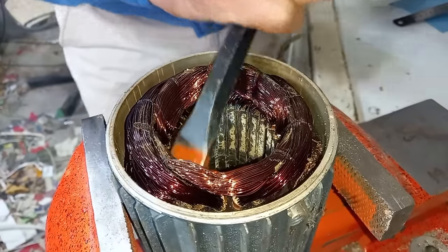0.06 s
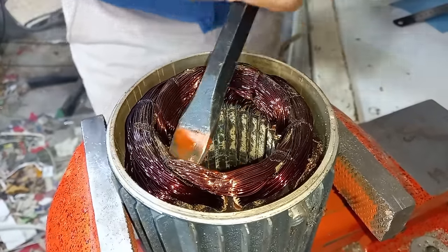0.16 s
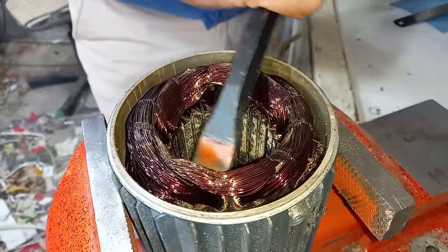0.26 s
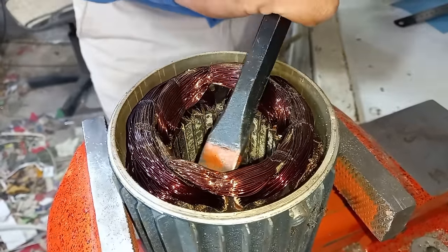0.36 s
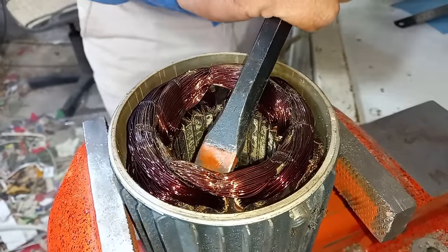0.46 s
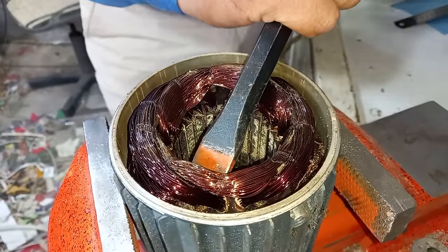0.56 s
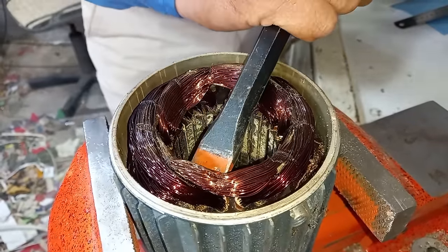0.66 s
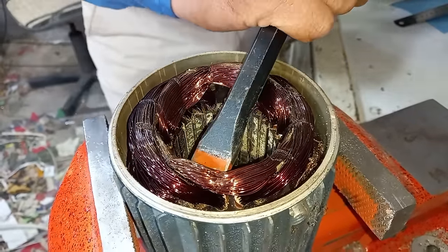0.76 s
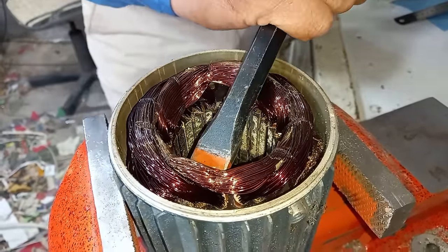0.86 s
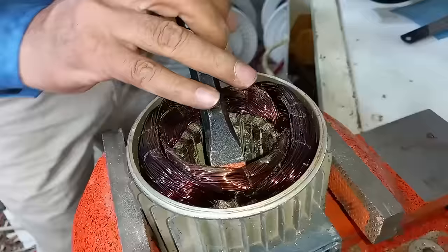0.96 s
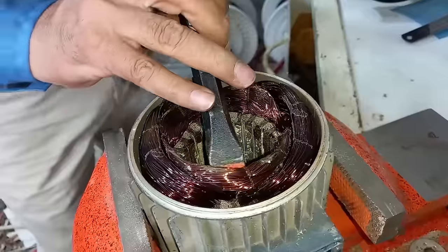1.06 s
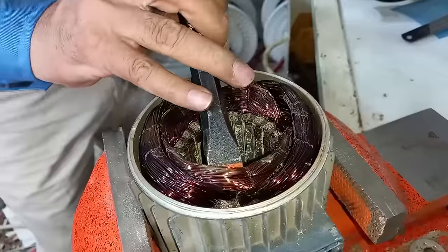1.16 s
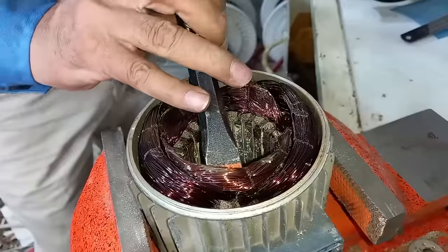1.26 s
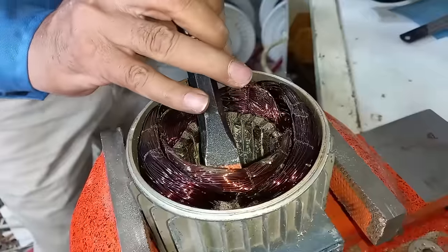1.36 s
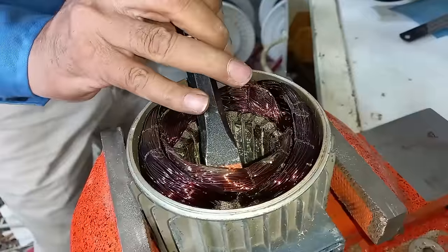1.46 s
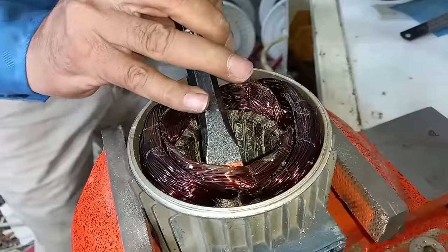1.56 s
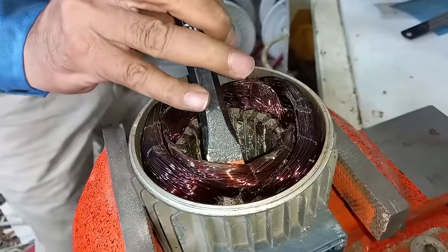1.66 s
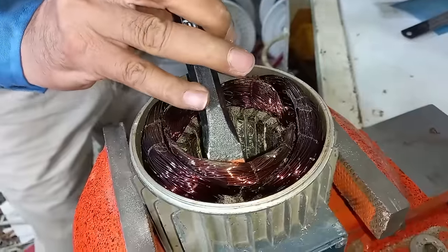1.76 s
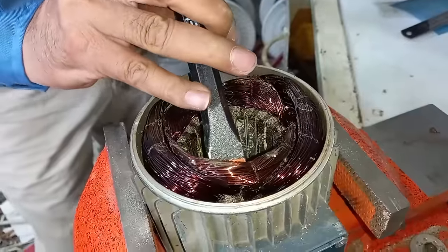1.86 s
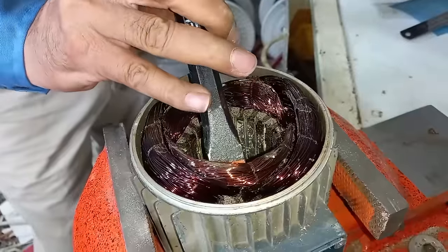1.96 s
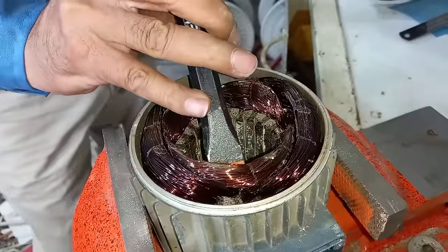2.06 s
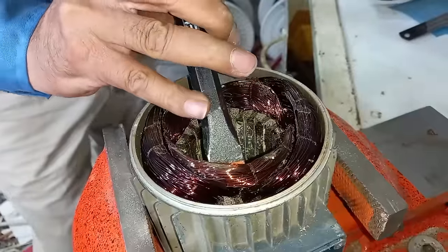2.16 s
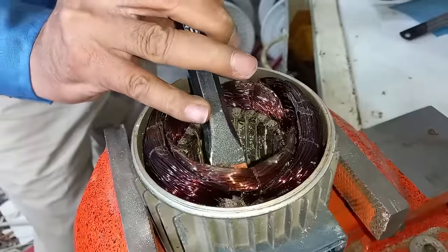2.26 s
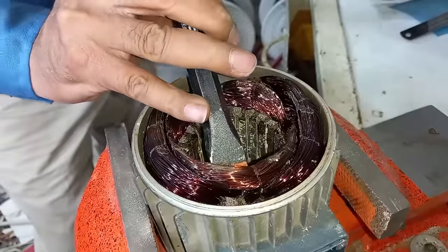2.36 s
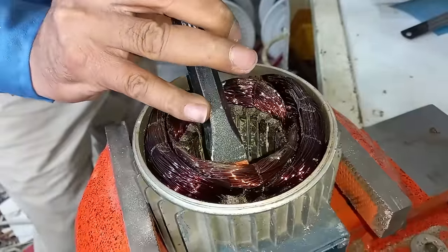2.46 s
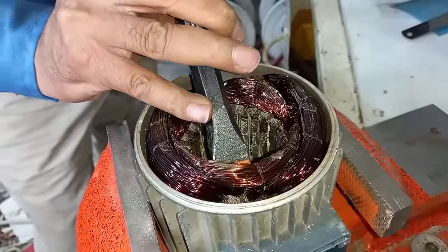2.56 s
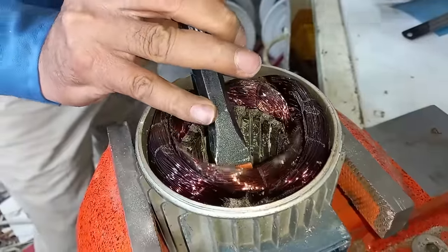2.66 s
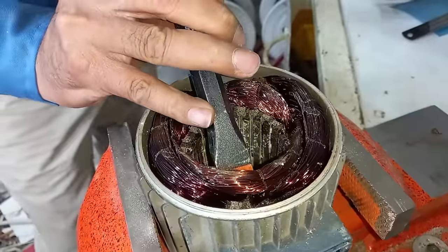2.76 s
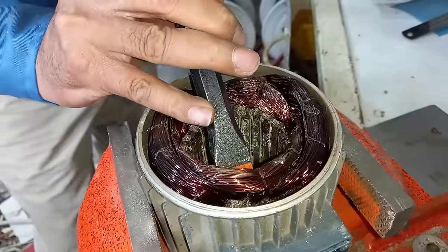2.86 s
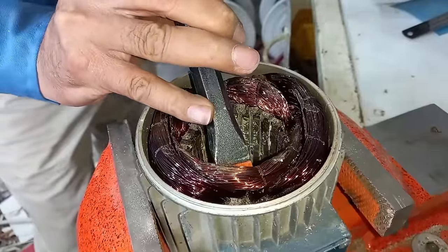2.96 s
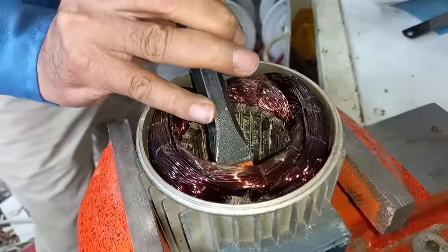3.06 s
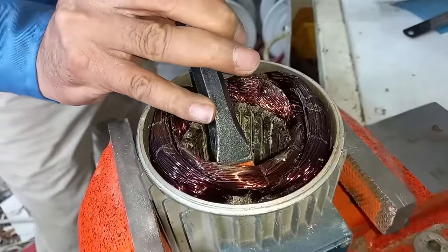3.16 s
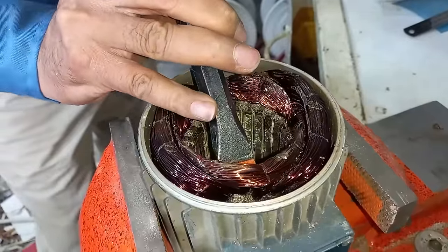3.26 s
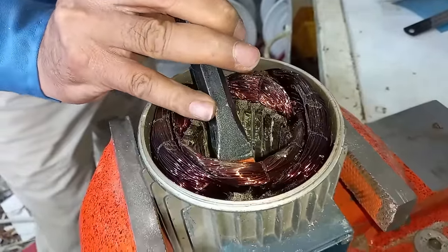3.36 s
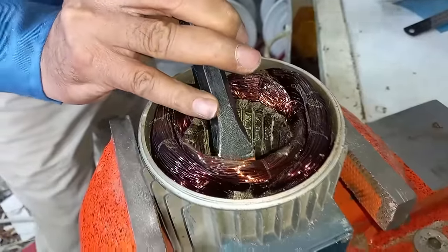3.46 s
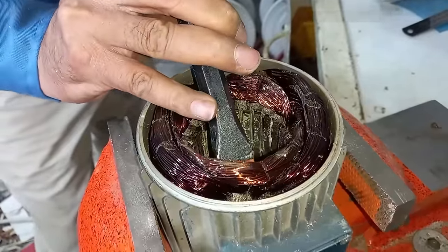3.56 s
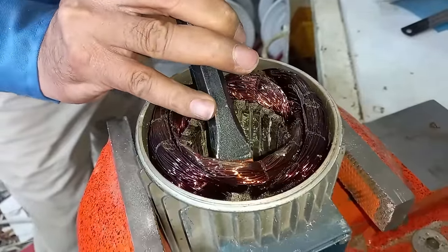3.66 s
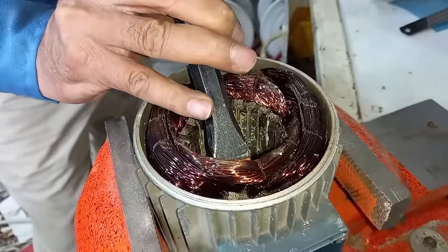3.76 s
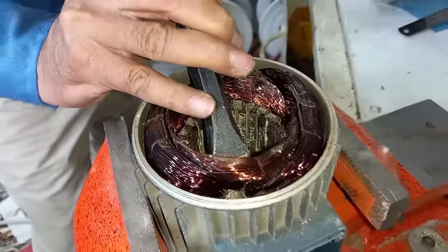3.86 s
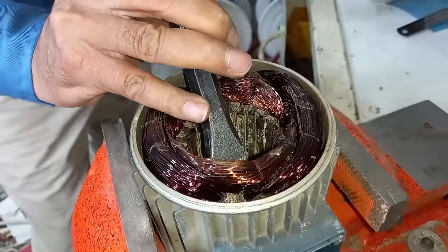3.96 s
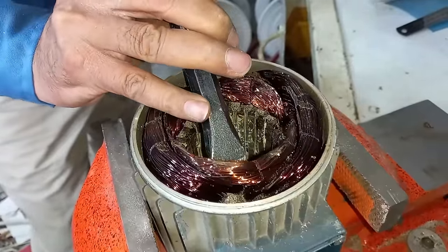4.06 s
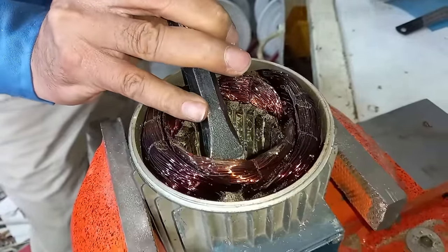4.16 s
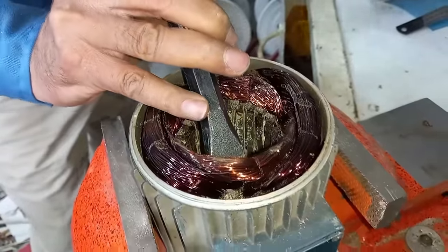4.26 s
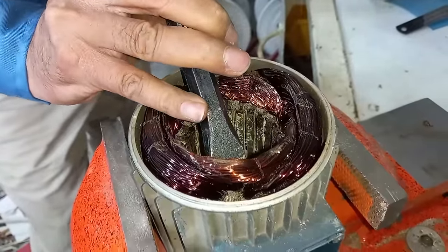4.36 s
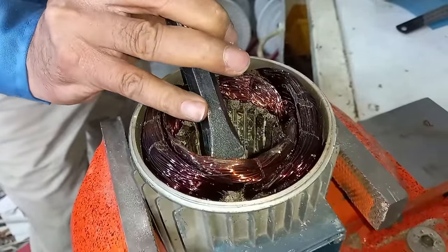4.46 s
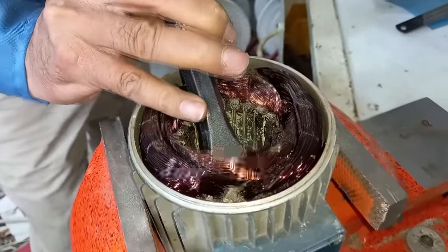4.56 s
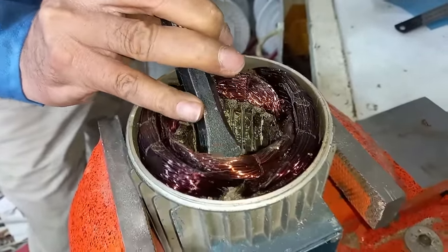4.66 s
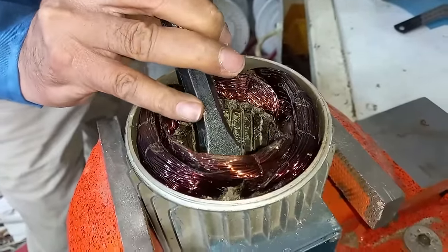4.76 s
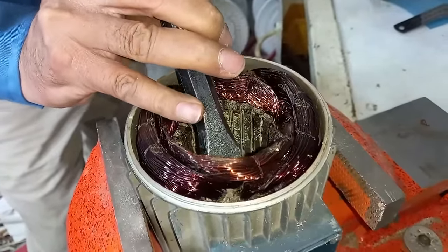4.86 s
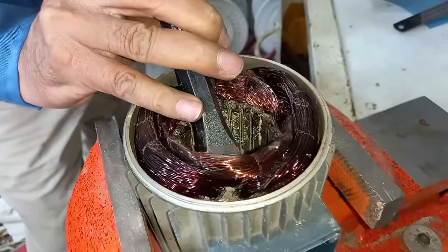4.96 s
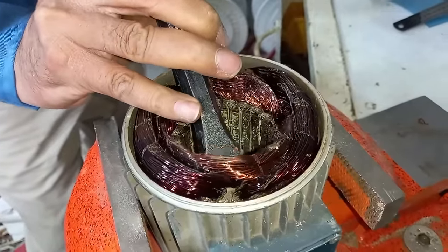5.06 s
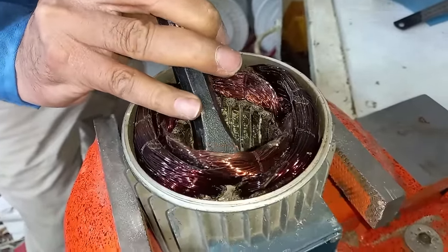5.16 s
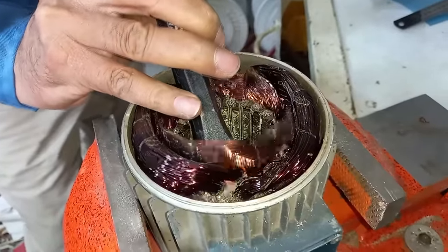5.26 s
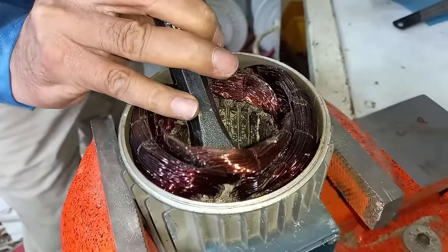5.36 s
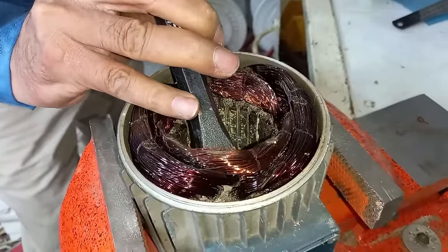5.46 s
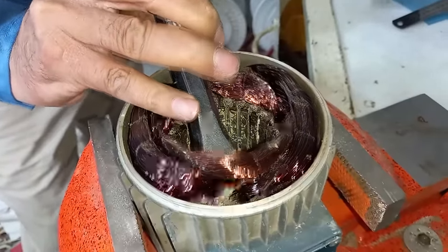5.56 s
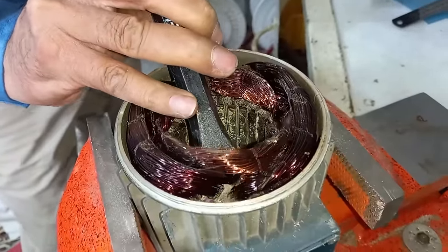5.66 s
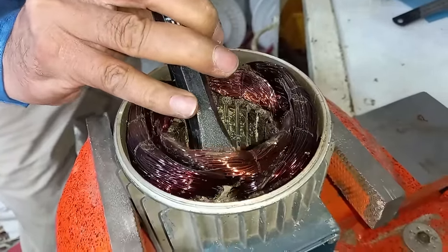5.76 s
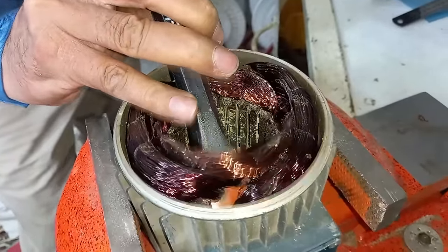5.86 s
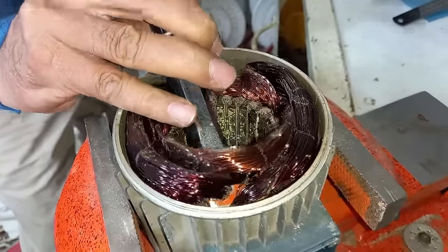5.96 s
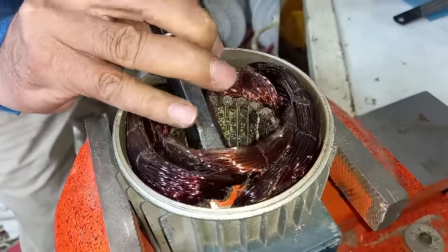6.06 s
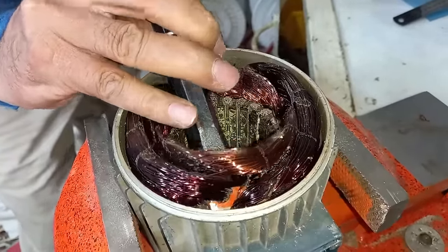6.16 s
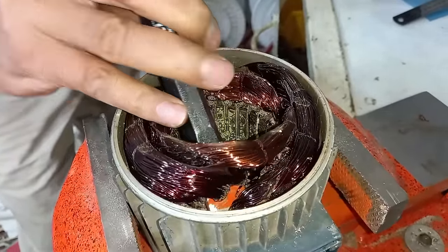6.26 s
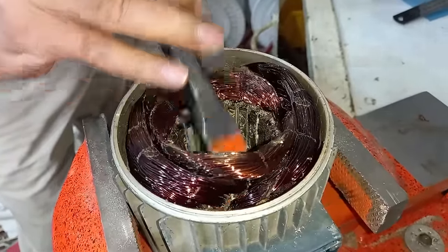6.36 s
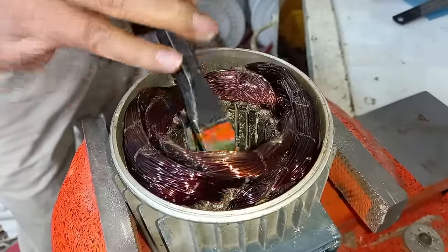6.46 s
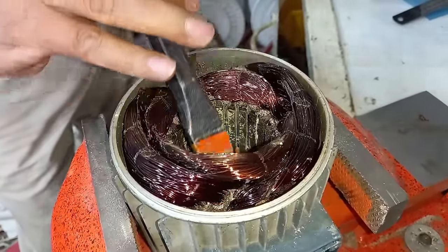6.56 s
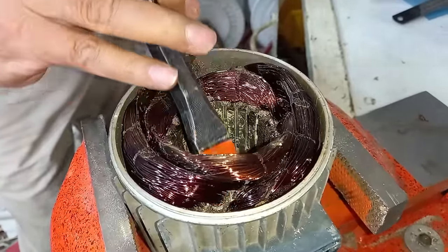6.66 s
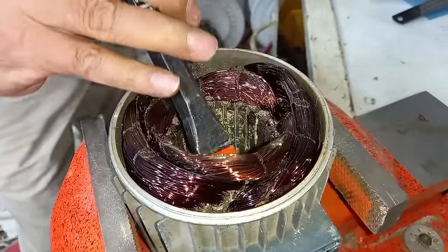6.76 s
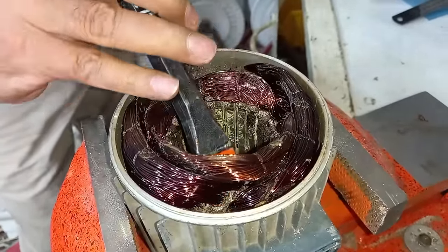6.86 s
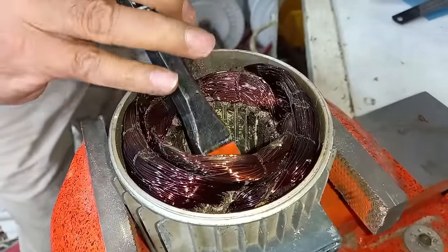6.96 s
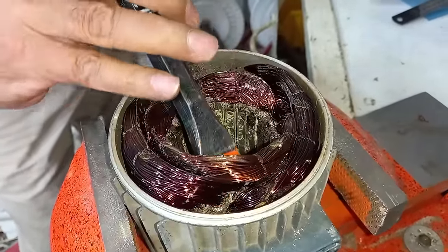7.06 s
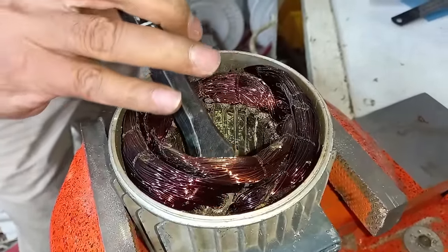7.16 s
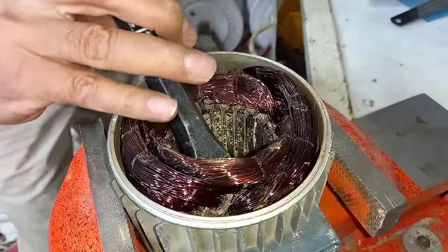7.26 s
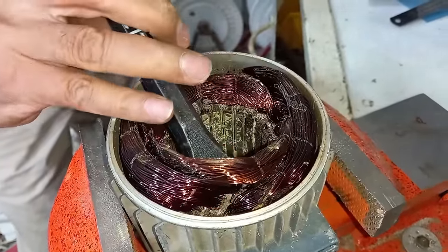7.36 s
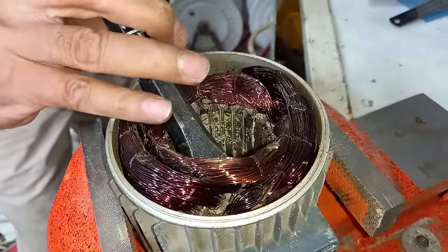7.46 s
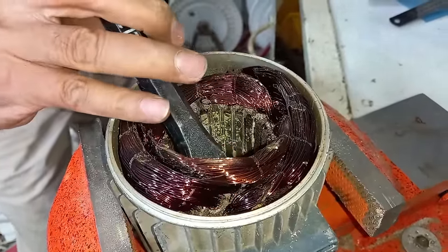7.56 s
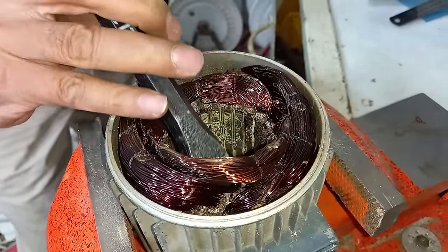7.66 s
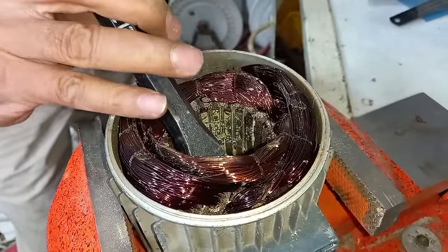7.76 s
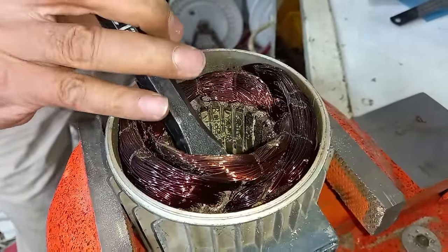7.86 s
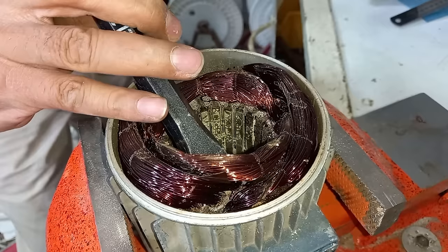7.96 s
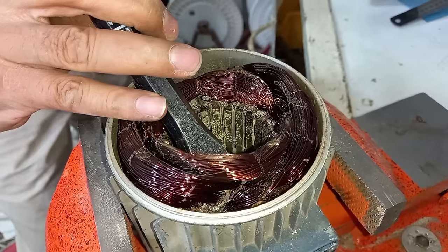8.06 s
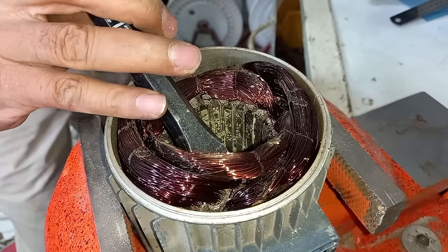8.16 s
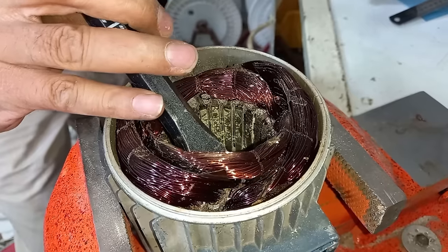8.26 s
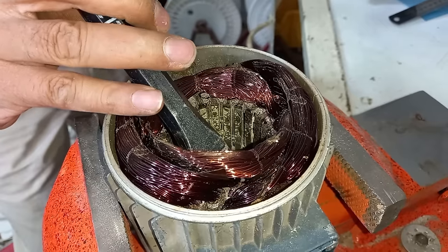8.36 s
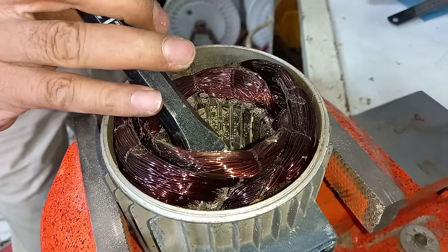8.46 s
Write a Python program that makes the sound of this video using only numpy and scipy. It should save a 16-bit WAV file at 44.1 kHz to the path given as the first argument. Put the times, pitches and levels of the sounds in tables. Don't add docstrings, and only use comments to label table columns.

```python
import sys
import numpy as np
from scipy import signal
from scipy.io import wavfile

SR = 44100
rng = np.random.default_rng(int(sys.argv[2]) if len(sys.argv) > 2 else 0)


def unload_audio(sound):
    columns = np.transpose(np.atleast_2d(sound))
    steps = np.round(np.clip(columns, -1, 1) * 32767)
    wavfile.write(sys.argv[1], SR, steps.astype(np.int16))


def boost_factor(decibels):
    exponent = np.asarray(decibels, float) / 20
    return 10 ** exponent


N = 375732

# time in seconds, gain in dB.
BACKGROUND_GATE = [
    [(0.0, -29), (0.3, -32), (0.51, -18.5), (0.975, -19)],
    [(1.03, -0.7), (1.3, -3.5), (1.9, -0.7), (4.2, 5), (6.1, -6.5), (6.35, -2.5), (6.6, -8.5), (7.1, -9.5),
     (7.37, -2), (8.04, -2.3), (8.52, 1)],
]
# frequency in Hz, level in dB per Hz.
RUMBLE_SPECTRUM = [(15, -53), (25, -21.5), (46, -13.5), (97, 4), (133, -15.5), (162, -6.5), (194, -17.5),
                   (334, -11.5), (700, -24.5), (910, -61.5), (1540, -120)]
# centre in Hz, width in Hz, level in dB.
RUMBLE_PEAKS = [(59.5, 8, -1.5), (97, 6.8, 1), (161, 10, -12), (334, 21, -10)]
# frequency in Hz, level in dB per Hz.
WHIRR_SPECTRUM = [(350, -27), (600, -4), (870, 10), (990, 4.5), (1190, -2), (1600, -5), (2000, -14.5),
                  (2500, -34.5), (4000, -37.5), (5200, -60.5)]
# frequency in Hz, level in dB per Hz.
HISS_SPECTRUM = [(1500, -30), (2500, -3.5), (4400, -11.5), (6200, -13), (8600, -16), (12000, -22.5),
                 (16000, -24.5)]
# frequency in Hz, left-right likeness from 0 to 1.
PORT_LIKENESS = [(40, 1), (150, 1), (300, 0.83), (600, 0.77), (2000, 0.12), (5000, 0.077), (14000, 0.091)]
# frequency in Hz, left over right in dB.
PORT_LEAN = [(35, 6), (80, 1), (160, 0), (700, 1), (10000, 2)]
# start in seconds, peak in dB, brightness in dB, t60 in seconds, thud in dB.
TOUCHES = [(0.0123, -50, 13.5, 0.14, -35), (0.065, -36.5, 6.5, 0.11, -4), (0.1124, -40.5, 3.5, 0.37, -3),
           (0.2197, -20, -0.5, 0.13, -3.5), (0.2624, -43, 7, 0.15, 16), (0.318, -30, -12, 0.12, -35),
           (0.6825, -32.5, 5, 0.0081, 1), (0.8394, -62.5, 13, 0.14, 7), (6.288, -58, 16, 0.24, 3),
           (6.356, -35, 6, 0.26, -13), (6.393, -27.5, 2, 0.14, -21), (6.4665, -31.5, 7.5, 0.16, -14),
           (6.488, -26, -1, 0.05, -26)]
# start in seconds, peak in dB, brightness in dB.
WIRE_SPRINGS = [(1.0744, -65, 11), (1.6294, -50.5, 6.5), (1.779, -53, 14), (3.419, -55, 17),
                (7.169, -58.5, 3), (7.2094, -62, 7), (7.263, -53.5, 7), (7.2804, -55, 9), (7.3068, -56, -9),
                (7.3327, -65, -2), (7.698, -52, 16), (7.7194, -55, 6), (8.38, -58, 8)]
# start in seconds, peak in dB, brightness in dB.
REBOUNDS = [
    (2.8682, -28, -30),
    (3.003, -28.5, -48.5),
    (3.666, -29, -6.5),
    (3.788, -27.5, -17),
    (4.0594, -29.5, -12.5),
    (4.179, -26, -10),
    (4.549, -37.5, -16.5),
    (5.8306, -42.5, -12),
    (5.8976, -36, -8),
]
# frequency in Hz, level in dB per Hz.
TICK_SPECTRUM = [(120, -24.5), (200, -4.5), (548, -4), (647, -15.5), (749, -8), (1320, -17.5), (10500, -36),
                 (13100, -44), (16000, -39)]
# start in seconds, peak in dB,
# pitch in Hz.
KNOCKS = [(.0125, -74, 3100), (.226, -45, 770), (.226, -51, 990), (.85, -88, 1400), (1.17, -72, 1140),
          (1.946, -31.5, 1012), (1.946, -41.5, 1170), (3.67, -75, 13520), (4.268, -28.5, 6060),
          (6.93, -66.5, 1063), (7.33, -63, 7700)]
# time in seconds, pressure in dB.
DRAG_PRESSURE = [
    [(0.05, -75), (0.068, -14), (0.094, -4.5), (0.162, -0.6), (0.2, -1.5), (0.3, -6.5), (0.384, 1.75),
     (0.5, -13.5), (0.58, -30)],
]
# centre in Hz, width in Hz, level in dB.
GROAN_PEAKS = [(111.4, 9.4, 9.5), (215.8, 7.6, 12), (364, 55, 2.5), (524, 8.7, -4), (731, 12, -12.5),
               (840, 20, -12.5), (970, 7.3, -9)]
# centre in Hz, width in Hz, level in dB.
RASP_PEAKS = [(2050, 490, 5), (2690, 260, 23), (3220, 400, 15), (3660, 98, 21), (5000, 250, 2),
              (5740, 380, 1), (7700, 780, 0.5), (11300, 2700, -18)]
# time in seconds, level in dB.
SHOVE = [
    [(7.16, -63), (7.186, -48.5), (7.218, -46), (7.336, -48), (7.5, -84)],
]
# centre in Hz, width in Hz, level in dB.
SHOVE_PEAKS = [(98.8, 28, -1), (146, 21, 0.5), (201, 95, -1.5), (330, 13, -6.5), (814, 70, -42)]
# time in seconds, level in dB.
WHINE = [
    [(0.45, -89), (0.975, -95)],
]
# start in seconds, peak in dB, pitch in Hz.
PINGS = [
    (1.0794, -68, 9000),
    (2.8694, -67, 10600),
    (3.6745, -58, 10540),
    (7.2624, -60, 9000),
    (7.306, -54, 8840),
    (7.3327, -59, 8930),
    (7.5094, -79, 9100),
    (7.6984, -49, 8970),
    (7.7894, -70, 9010),
    (8.4048, -62, 8940),
]
# start in seconds, peak in dB, bench boom in dB, casing in dB, brightness in dB.
BLOWS = [(1.9449, -18, -7, 4, -2), (2.2957, -10.5, -1, .5, -1), (2.6803, -9.5, -2.5, 1, 2),
         (3.0727, -11, -.6, 2.1, 2.5), (3.476, -11, -1.1, 1.1, 3), (3.8724, -7.5, -2.5, .6, 2.1),
         (4.2673, -7, -1.5, 0, 0), (4.6295, -8, -1.1, 2.1, 1.5), (4.9679, -9.5, -.6, 2.1, 2.5),
         (5.311, -7, -2.5, -1.1, 1.5), (5.63, -9.5, -.6, 1.1, 4), (5.937, -10, -5.5, .6, 5)]
# centre in Hz, width in Hz, level in dB.
CHISEL_MODES = [(1370, 540, -14.5), (2136, 380, -9.5), (2935, 190, -4.5), (3770, 43, -5.5), (5600, 52, -8),
                (6305, 290, -1), (8430, 490, 3.5), (9290, 110, -9.5), (13500, 880, 0), (14800, 330, -6.5)]
# frequency in Hz, level in dB, t60 in seconds, swell in seconds.
BENCH_MODES = [(64, 5.5, 0.097, 0.00043), (89.75, -2.5, 0.49, 0.0014), (109.1, -5.5, 0.6, .004),
               (135.6, -4.5, 0.51, 0.0052), (221.7, 6.5, 0.34, 0.027), (265.7, 2, 0.35, 0.037),
               (291.3, 9.5, 0.28, .03), (339.7, -3, 0.36, 0.014), (449.3, -2.5, 0.22, 0.028),
               (485.4, -14, 0.36, 0.0044), (555.6, -16, 0.52, 0.045), (796, -18.5, 0.47, .003),
               (1161, -13, 0.39, 0.004)]
# frequency in Hz, level in dB per Hz.
CLATTER_SPECTRUM = [(24, -42), (40, -29.5), (97, -10), (168, -12), (300, -12), (420, -13), (600, -19),
                    (800, -22.5), (1140, -22), (2370, -19), (5000, -27), (8570, -27), (14000, -45),
                    (16000, -31), (17500, -39)]
# frequency in Hz, t60 in seconds.
CLATTER_T60 = [(50, 0.8), (130, 0.6), (350, 0.41), (920, 0.35), (2400, 0.24), (6400, 0.22), (11000, 0.18),
               (15000, 0.16)]
# frequency in Hz, rise in seconds.
CLATTER_RISE = [(50, 0.0033), (300, 0.033), (1000, 0.0034), (3000, 0.00014), (15000, 0.0017)]
# frequency in Hz, likeness of the blows from 0 to 1.
BLOW_LIKENESS = [(60, .9), (250, .75), (600, .55), (2000, .4), (5000, .33)]
# first hop in seconds, peak in dB, gap in seconds, loss per hop in dB.
WASHER_JOLTS = [
    (2.8732, -57.5, .066, 1.4),
    (3.2086, -49.5, .1, 6),
    (3.61, -47.5, .068, 5.5),
    (4.0137, -52.5, .066, 2.1),
    (4.451, -50, .05, 4),
    (4.846, -55, .052, 16.5),
    (5.198, -69.5, .06, 5),
    (5.547, -63, .06, 12.5),
    (5.8295, -51, .066, 7),
    (6.1344, -57, .072, 16),
]

EDGES = 28 * 2 ** np.arange(0, 9.4, 1 / 3)
CENTRES = np.sqrt(EDGES[1:] * EDGES[:-1])
LAG_SAMPLES, FAR_LEAD_SAMPLES = 8, 21


def rms_one(x):
    return x / np.sqrt(np.mean(x ** 2) + 1e-20)


def in_time(tables):
    t = np.arange(N) / SR
    return sum(boost_factor(np.interp(t, *np.array(rows).T, left=-200, right=-200)) for rows in tables)


def at_hz(points, hz):
    points = np.array(points)
    return np.interp(np.log(hz), np.log(points[:, 0]), points[:, 1])


def drift(rate_hz):
    r = np.exp(-80 * np.pi * rate_hz / SR)
    slow = signal.lfilter([1], [1, -2 * r, r * r], rng.standard_normal(N // 40 + 2002))[2000:]
    return np.interp(np.arange(N) / 40, np.arange(len(slow)), rms_one(slow))


def clicks(s, sizes):
    out = np.full(N, 1e-18)
    out[np.round(np.asarray(s) * SR).astype(int)] = sizes
    return out


def fade(x, t60):
    return signal.lfilter([1], [1, -boost_factor(-60 / (max(t60, .002) * SR))], x)


def ring(x, hz, t60):
    r, w = boost_factor(-60 / (t60 * SR)), 2 * np.pi * hz / SR
    return signal.lfilter([0, np.sin(w)], [1, -2 * r * np.cos(w), r * r], x)


def width_t60(width_hz):
    return np.log(1000) / np.pi / width_hz


def filtered(x, order, hz, kind):
    return signal.sosfilt(signal.butter(order, hz, kind, fs=SR, output="sos"), x)


def peaked_noise(peaks):
    mid, side = rng.standard_normal((2, N))
    white = mid + 0.32 * side * [[1], [-1]]
    total = 0
    for k, (hz, width, db) in enumerate(peaks):
        mode = rms_one(ring(white, hz, width_t60(width)))
        total = total + (-1) ** k * boost_factor(db) * np.sqrt(width) * mode
    return rms_one(total)


def lean(hz):
    return boost_factor(at_hz(PORT_LEAN, hz) / 2 * np.array([[1], [-1]]))


def bands():
    white, out = rng.standard_normal((2, 2, N)), []
    for k, hz in enumerate(CENTRES):
        mid, side = filtered(white[k % 2], 2, [EDGES[k], EDGES[k + 1]], "band")
        alike = np.clip(at_hz(PORT_LIKENESS, hz), 0, 1)
        out.append(lean(hz) * (np.sqrt(1 + alike) * mid + np.sqrt(1 - alike) * side * [[1], [-1]]))
    return out


def coloured(noise, spectrum, patchy_db, rate_hz):
    total = 0
    for hz, band in zip(CENTRES, noise):
        total = total + boost_factor(at_hz(spectrum, hz) + patchy_db * drift(rate_hz)) * band
    return rms_one(total)


def background(noise):
    rumble = boost_factor(-1) * coloured(noise, RUMBLE_SPECTRUM, patchy_db=2, rate_hz=17)
    rumble = rumble + boost_factor(-4.0 + 3.6 * drift(3.8)) * peaked_noise(RUMBLE_PEAKS)
    fan = filtered(rng.standard_normal((2, N)), 4, [1800, 2300], "band")
    whirr = boost_factor(-2.16) * coloured(noise, WHIRR_SPECTRUM, patchy_db=4.0, rate_hz=4.6)
    whirr = whirr + boost_factor(-11.5) * rms_one(fan)
    hiss = coloured(noise, HISS_SPECTRUM, patchy_db=.3, rate_hz=9.3)
    gate = in_time(BACKGROUND_GATE)
    opened = 1 + fade(clicks(np.array(BLOWS)[:, 0], boost_factor(29)), t60=0.46)
    far = boost_factor(-53) * gate * rumble
    far = far + boost_factor(-64) * gate ** 1.1 * np.sqrt(opened) * whirr
    far = far + boost_factor(-82) * gate * opened * hiss
    return np.array([far[0] * boost_factor(-0.5), np.roll(far[1], FAR_LEAD_SAMPLES)])


def ticks(noise, level_db, rise_s):
    out = np.zeros((2, N))
    t = np.arange(SR // 4) / SR
    onsets = 1 - np.exp(-(t * CENTRES[:, None] / (rise_s * 1000)) ** 2)
    spring_t60, spring_thud_db = 0.15, -1.5
    rebound_t60, rebound_thud_db = 0.21, -2
    rows = TOUCHES + [(*row, spring_t60, spring_thud_db) for row in WIRE_SPRINGS]
    rows += [(*row, rebound_t60, rebound_thud_db) for row in REBOUNDS]
    for s, peak_db, bright_db, t60, thud_db in rows:
        start = round(s * SR)
        span = slice(start, min(N, start + len(t)))
        n = span.stop - start
        tilt = [(400, thud_db), (2500, 0.02), (8000, bright_db), (16000, 2 * bright_db)]
        colour_db = at_hz(TICK_SPECTRUM, CENTRES) + at_hz(tilt, CENTRES)
        burst = sum(boost_factor(db) * band[:, span] * onset[:n] for db, band, onset in zip(colour_db, noise, onsets))
        out[:, span] += boost_factor(peak_db + level_db - 60 * t[:n] / np.clip(t60, .008, .3)) * burst
    return out


def tinkles(table, level_db, t60, buzz_s):
    out = np.zeros(N)
    t = np.arange(SR // 4) / SR
    for s, peak_db, hz in table:
        buzz = ring(rng.standard_normal(len(t)) * np.exp(-t / buzz_s), hz, t60)
        at = round(s * SR)
        out[at:at + len(t)] += (boost_factor(peak_db + level_db) * buzz / np.abs(buzz).max())[:N - at]
    return out


def drag():
    body = filtered(peaked_noise(GROAN_PEAKS), 4, [70, 1150], "band")
    wire = filtered(peaked_noise(RASP_PEAKS), 4, 1850, "high")
    pressure = in_time(DRAG_PRESSURE)
    groan = boost_factor(-40 + 2 * drift(33)) * pressure * body
    rasp = boost_factor(-51.5 + 2 * drift(38)) * pressure ** 3.3 * wire
    boom = boost_factor(-0.5) * in_time(SHOVE) * peaked_noise(SHOVE_PEAKS)
    return groan + rasp + boom


def whine():
    return in_time(WHINE) * peaked_noise([(8360, 660, 0)])


def blow_colour(hz):
    _, peak_db, boom_db, casing_db, bright_db = np.transpose(BLOWS)
    thud_db = 2 * boom_db - np.median(boom_db)
    rows = zip(thud_db, boom_db, casing_db, bright_db)
    return peak_db + np.array([at_hz(list(zip([50, 250, 1200, 9000], row)), hz) for row in rows])


def crack(level_db, t60, snap_db):
    hits = clicks(np.array(BLOWS)[:, 0], boost_factor(blow_colour(4100) + level_db))
    burst = boost_factor(snap_db) * hits + fade(hits, t60) * rng.standard_normal(N)
    return filtered(burst, 2, [1200, 14500], "band")


def chisel(level_db, spread_db):
    s, out = np.array(BLOWS)[:, 0], 0
    chance = rng.standard_normal((len(s), len(CHISEL_MODES)))
    mid, side = rng.standard_normal((2, N))
    white = mid + side * [[1], [-1]]
    for k, (hz, width, db) in enumerate(CHISEL_MODES):
        hits = clicks(s, boost_factor(blow_colour(hz) + db + level_db + spread_db * chance[:, k]))
        shaken = fade(hits, at_hz(CLATTER_T60, hz)) * white
        out = out + np.sqrt(width / SR) * ring(shaken, hz, width_t60(width))
    return out


def bench(level_db, spread_db, skew):
    s, out = np.array(BLOWS)[:, 0], 0
    chance = rng.standard_normal((len(s), len(BENCH_MODES)))
    for k, (hz, db, t60, swell_s) in enumerate(BENCH_MODES):
        hits = clicks(s, boost_factor(blow_colour(hz) + db + level_db + spread_db * chance[:, k]))
        tone = ring(hits, hz, t60) - ring(hits, hz, min(np.log(1000) * swell_s, t60 / 2))
        out = out + lean(hz) * [tone, np.roll(tone, round((-1) ** k * skew * SR / hz))]
    return out


def clatter(noise, level_db, spread_db):
    out, t = np.zeros((2, N)), np.arange(SR // 2) / SR
    chance = rng.standard_normal((len(BLOWS), len(CENTRES)))
    for k, hz in enumerate(CENTRES):
        alike = at_hz(BLOW_LIKENESS, hz)
        sizes_db = blow_colour(hz) + at_hz(CLATTER_SPECTRUM, hz) + level_db + spread_db * chance[:, k]
        onset = 1 - 0.34 * np.exp(-t / max(at_hz(CLATTER_RISE, hz), 1e-4))
        same = noise[k][:, -len(t):]
        for (s, _, boom_db, *_), db in zip(BLOWS, sizes_db):
            length = 1.088 - 0.0108 * boom_db
            span = slice(round(s * SR), round(s * SR) + len(t))
            mix = np.sqrt(alike) * same + np.sqrt(1 - alike) * noise[k][:, span]
            out[:, span] += boost_factor(db - 60 * t / (length * at_hz(CLATTER_T60, hz))) * onset * mix
    return out


def washer_hops():
    washer_hz, wobble = 6870, 0.0052
    chance = rng.standard_normal((len(WASHER_JOLTS), 4))
    hops = []
    for (s, db, gap, loss_db), row in zip(WASHER_JOLTS, chance):
        for k, w in enumerate(row):
            hops.append((s + k * gap, db - k * loss_db, washer_hz * (1 + wobble * w)))
    return hops


def scene():
    noise = bands()
    near = ticks(noise, level_db=4, rise_s=0.00115) + drag()
    near = near + tinkles(KNOCKS, level_db=8.5, t60=0.055, buzz_s=0.026)
    near = near + tinkles(PINGS, level_db=-0.5, t60=0.045, buzz_s=0.012)
    near = near + crack(level_db=-2.5, t60=0.011, snap_db=0.5)
    near = near + chisel(level_db=-13, spread_db=1.0)
    near = near + bench(level_db=-12.5, spread_db=-4.0, skew=0.067)
    near = near + clatter(noise, level_db=13, spread_db=2.5)
    near = near + tinkles(washer_hops(), level_db=1.5, t60=.013, buzz_s=.04)
    near = np.array([np.roll(near[0], LAG_SAMPLES), near[1]])
    return near + whine() + background([band[:, ::-1] for band in noise])


def limiter(x, top_db, release_db_s):
    ramp = release_db_s * np.arange(N) / SR
    over = np.maximum(20 * np.log10(np.abs(x).max(axis=0) + 1e-9) - top_db, 0)
    held = np.maximum.accumulate(over + ramp) - ramp
    return x * boost_factor(-signal.lfilter([.2], [1, -.8], held))


def low_pass(x):
    return signal.sosfilt(signal.butter(12, 16990, fs=SR, output="sos"), x)


def record(dry):
    x = filtered(dry, 3, 42, "high")
    x = limiter(x, top_db=-5.0, release_db_s=156.0)
    mix = signal.sosfilt(signal.cheby2(10, 60, 17000, fs=SR, output="sos"), x)
    return low_pass(mix)


dry = scene()
out = record(dry)
unload_audio(out)
```